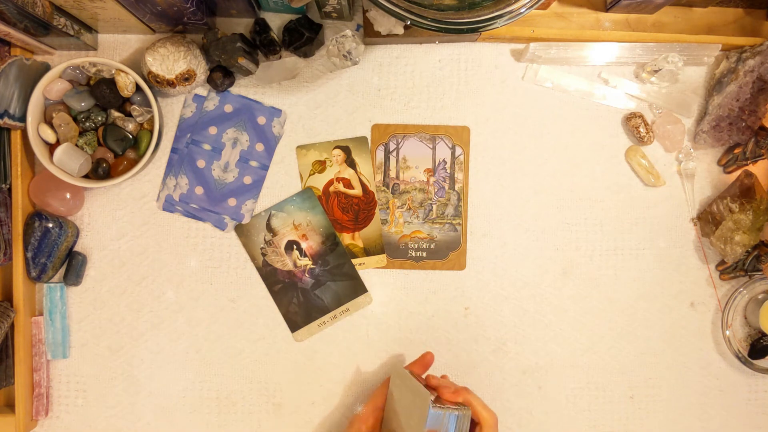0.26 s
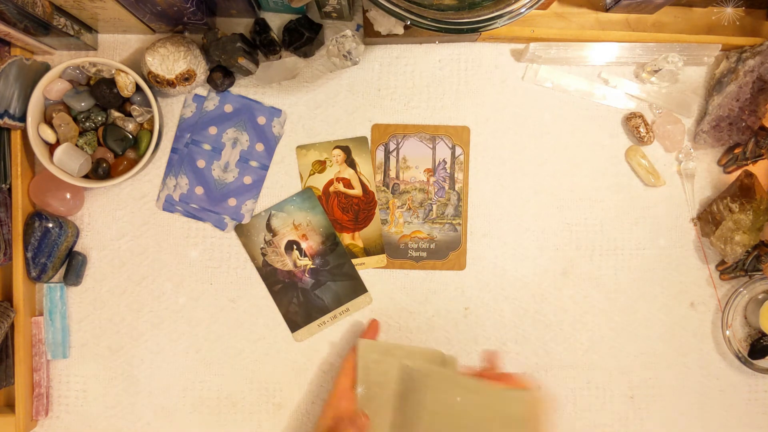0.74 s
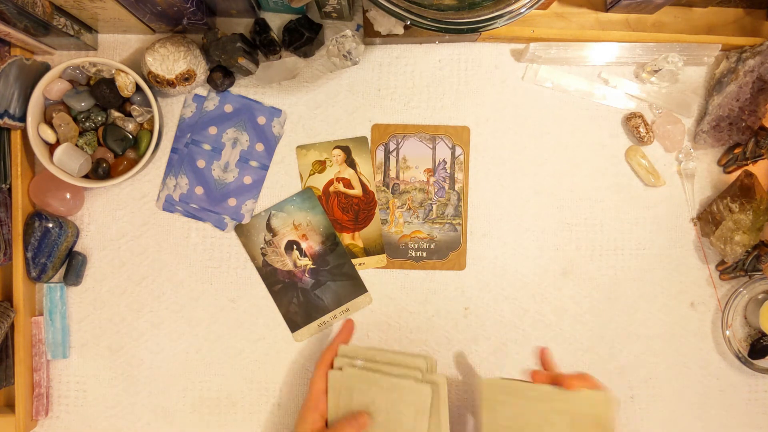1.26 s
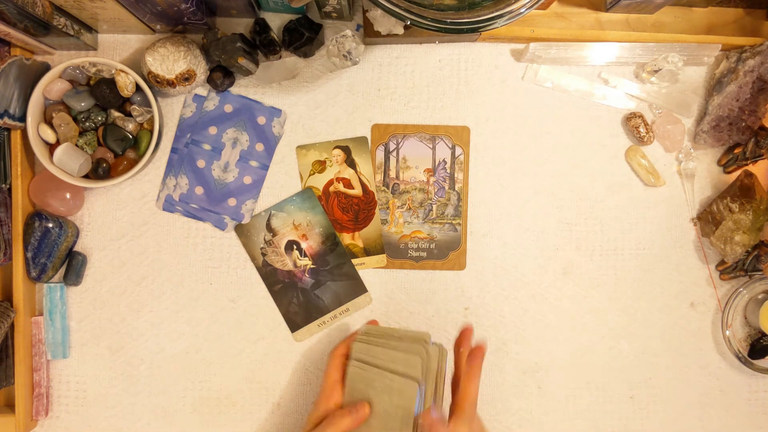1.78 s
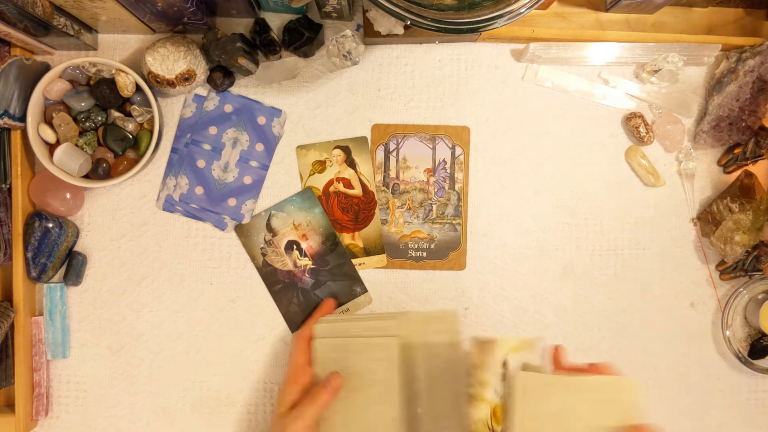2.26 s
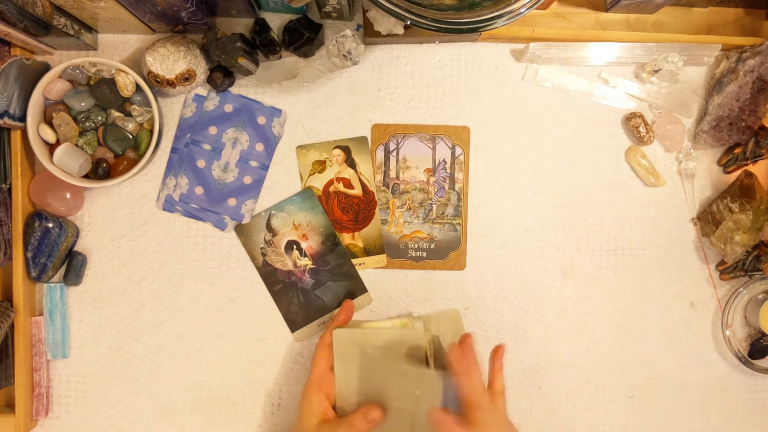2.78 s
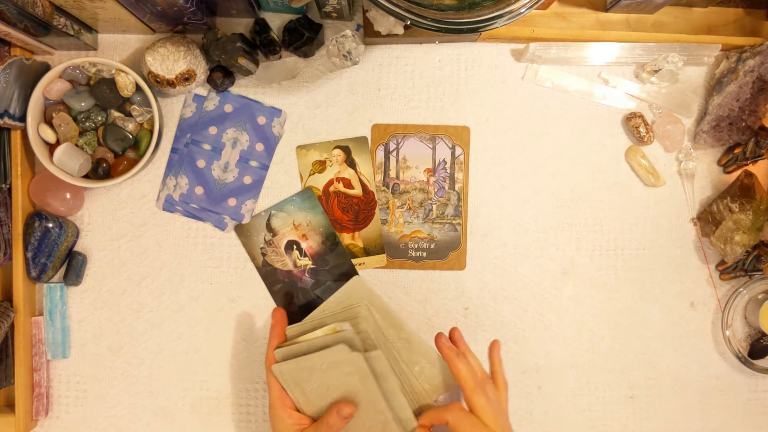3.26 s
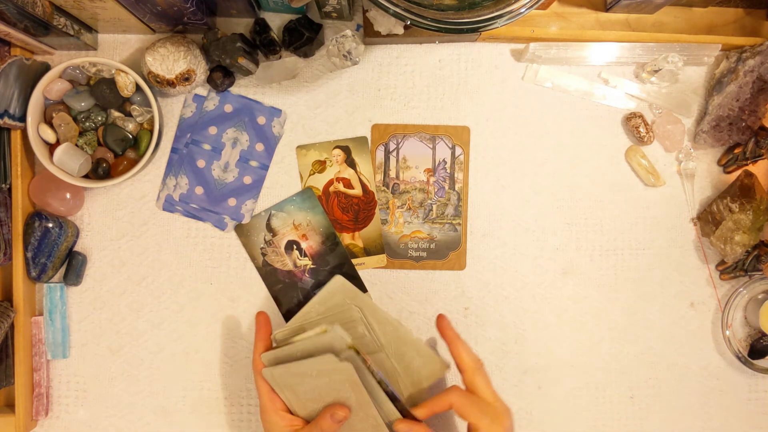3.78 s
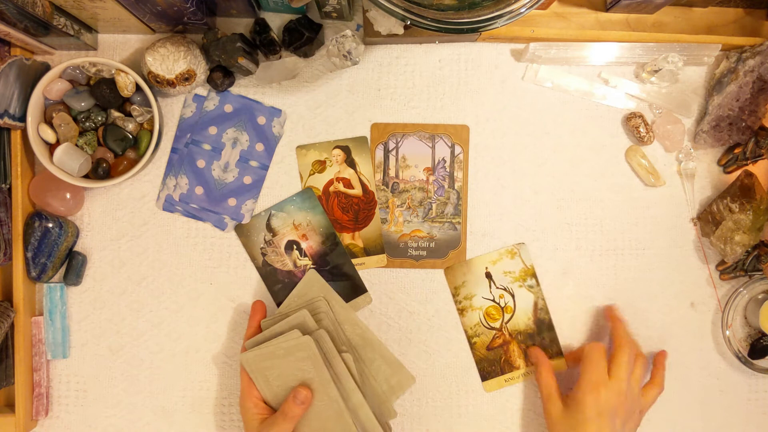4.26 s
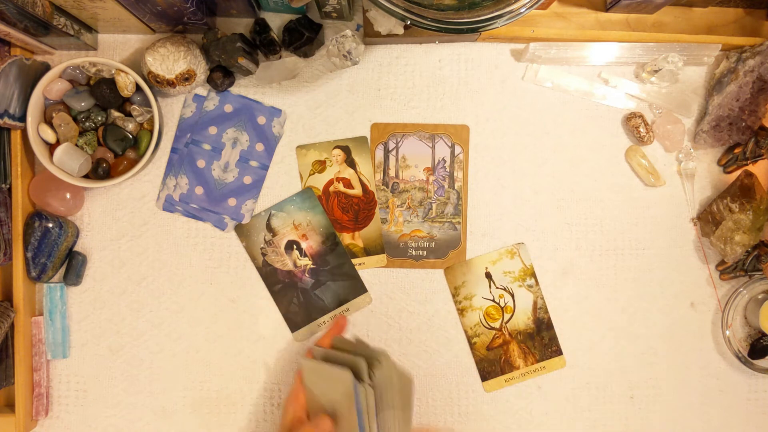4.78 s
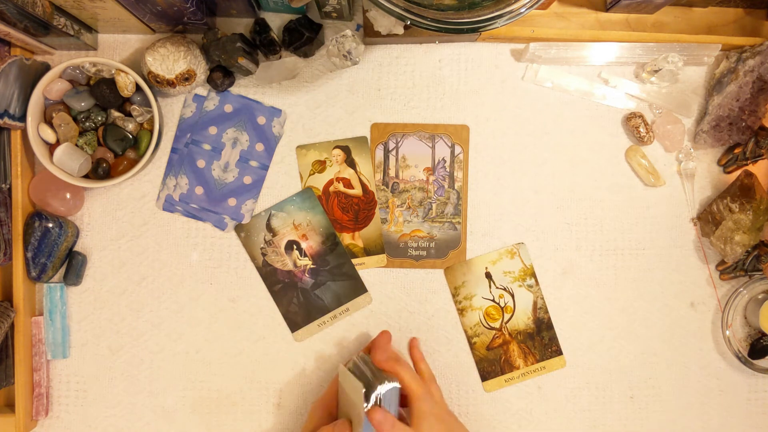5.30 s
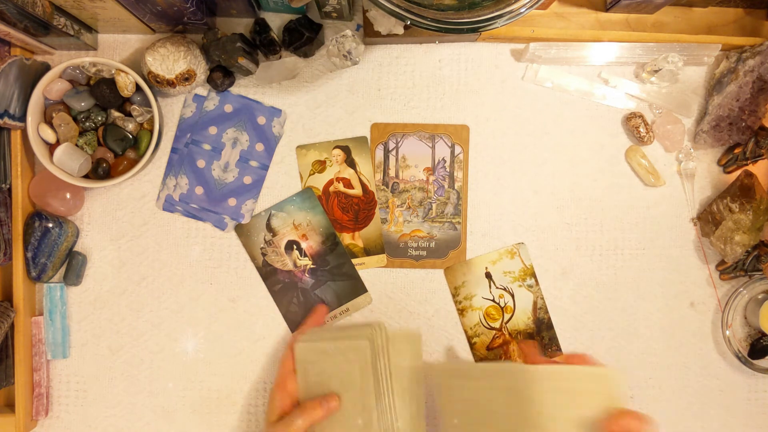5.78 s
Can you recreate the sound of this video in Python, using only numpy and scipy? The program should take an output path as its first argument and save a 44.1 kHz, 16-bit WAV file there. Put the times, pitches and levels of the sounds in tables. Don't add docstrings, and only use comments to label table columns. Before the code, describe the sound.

A small, dry, quiet room with a steady faint low ventilation hum; the cards are close to a phone microphone. At first there are only faint rubs and a tiny tick, with a brief soft press at 0.8 s. From 1.0 to 1.65 s stiff coated cards slide in gritty, bright hissing bursts with sharp edge snaps and small woody knocks. Near-quiet light rubbing follows, with a small tick at 2.1 s and a short hiss at 2.45 s. The hardest knocks and cracking snaps hit at 2.63 and 3.03 s, with a dry clatter and very short echo. Then it is sparse: faint finger rubs, a soft card slide around 4.2 s, dull packet knocks at 4.4 and 4.5 s, a light drag near 4.9 s and soft brushing after 5 s. Just after 6.0 s a card is pressed down with a short crisp scrape.

```python
import sys
import numpy as np
from scipy import signal
from scipy.fft import rfft, irfft, next_fast_len
from scipy.io import wavfile
from scipy.ndimage import uniform_filter1d

SR = 44100
rng = np.random.default_rng(int(sys.argv[2]) if len(sys.argv) > 2 else 0)


def generate_wav(sig):
    pcm = np.round(np.clip(np.atleast_2d(sig).T, -1, 1) * 32767).astype(np.int16)
    wavfile.write(sys.argv[1], SR, pcm)


def linear_from_db(decibels):
    return 10 ** (np.asarray(decibels, float) / 20)


N = 266302

# (frequency [Hz], level [dB])
HUM_COLOUR = [(20, -17.5), (42, -19.5), (62, -5), (95, -7), (200, -7), (300, -3), (440, -9.5), (800, -11),
              (1650, -17), (1950, -22.5), (3500, -31.5), (8100, -36.5), (14800, -36), (16000, -37.5)]
# (frequency [Hz], width [Hz], boost [dB])
AIR_NOTES = [(77, 24, 6.5), (118, 63, 2), (164.6, 16, 12.5)]
# (frequency [Hz], time [s])
ECHO_TIME = [(200, .15), (700, .13), (2500, .15), (8000, .16), (15000, .13)]
# (start [s], end [s])
HUSH = (1.545, 1.5645)
BAND_EDGES = (2700, 5800, 10300)
# (frequency [Hz], level [dB])
SLIDE_COLOUR = [(350, -45), (650, -24), (1200, -16), (1540, -13), (1790, -5), (1930, -12.5), (2270, -5),
                (2620, -11), (4260, -6), (4910, -3.5), (5780, -4.5), (7200, 3), (8100, 7), (9000, 0.5),
                (10300, -8), (13300, -6), (15400, -12.5), (16300, -23)]
# (frequency [Hz], level [dB])
SNAP_COLOUR = [(880, -22), (1500, -2.5), (1980, -11), (2340, -5), (2830, -7), (5600, -5), (8400, -1.5),
               (12400, -11.5), (15500, -18.5), (17000, -25)]

# (time [s], peak [dB], pitch [Hz], 60 dB fade [s])
EDGE_KNOCKS = [(.0453, -47, 587, .022), (.0466, -40, 6440, 0.003), (1.034, -39.5, 590, 0.01),
               (1.039, -38.5, 720, 0.0028), (1.0394, -20.5, 1250, 0.0018), (1.069, -50, 1840, 0.026),
               (1.0753, -41, 2540, 0.0091), (1.128, -44, 1630, 0.0032), (1.3867, -39.5, 1540, 0.016),
               (1.4309, -41.5, 1476, 0.024), (1.4497, -45, 1548, 0.16), (1.636, -42, 1700, 0.022),
               (2.1191, -40, 540, 0.0086), (2.6335, -23.5, 583, 0.04), (2.6345, -20, 950, 0.0071),
               (2.7472, -37, 500, 0.014), (3.0247, -14, 621.6, 0.012), (3.0255, -19, 1140, 0.0094),
               (3.0298, -12, 1020, 0.0027), (3.0813, -12.5, 570, 0.0081), (4.2455, -37, 814, 0.024),
               (4.5296, -26, 621, 0.0084), (4.5305, -28.5, 2030, 0.011), (4.5305, -35, 1530, 0.0096),
               (2.1195, -44.5, 2290, 0.0041), (2.1195, -46, 4660, 0.0094), (3.0815, -37, 1150, 0.0045)]
# (time [s], peak [dB], pitch [Hz], 60 dB fade [s])
SLANTED_KNOCKS = [(1.375, -33, 984, 0.016), (1.376, -25.5, 2283, 0.0071), (1.397, -39, 836, 0.018),
                  (1.4085, -38.5, 870, 0.0047), (1.578, -30.5, 680, 0.0071), (1.597, -36.5, 730, 0.0079),
                  (2.529, -50, 450, 0.1), (2.543, -44, 492, 0.058), (2.54, -48.5, 1780, 0.029),
                  (2.543, -55, 1223, 0.11), (2.61, -47, 1530, 0.025), (2.6338, -17, 1463, 0.016),
                  (2.634, -24.5, 198, 0.017), (2.6418, -28.5, 1403, 0.085), (2.74, -40, 1510, 0.011),
                  (3.036, -35, 1460, 0.044), (3.042, -34, 883, 0.023), (3.048, -36, 1020, 0.014),
                  (3.051, -34, 1545, 0.051), (3.058, -42, 750, 0.051), (3.033, -32, 650, .03),
                  (3.04, -35, 420, 0.072), (3.083, -33, 300, 0.031), (3.093, -33.5, 520, 0.012),
                  (3.101, -39, 595, 0.015), (3.119, -45, 464, 0.013), (4.4105, -24, 835, 0.026),
                  (4.4237, -34.5, 856, .03), (4.4145, -39, 1090, .015), (4.415, -38.5, 560, .015),
                  (4.427, -42.5, 1104, 0.036), (4.426, -42.5, 587, .05), (4.445, -46, 834, 0.023),
                  (4.427, -72, 2440, 0.027), (4.473, -58, 1670, 0.059), (4.459, -62.5, 1700, .015),
                  (4.412, -39, 410, 0.017), (4.456, -44.5, 461, 0.018)]
# (time [s], peak [dB], pitch [Hz], 60 dB fade [s])
FLAT_KNOCKS = [(1.0425, -36.5, 1563, 0.049), (1.057, -42, 1510, 0.048), (1.07, -45, 1084, 0.075),
               (1.098, -47.5, 1550, 0.057), (1.3722, -34.5, 675, 0.0029), (1.4393, -45, 2540, 0.017),
               (1.621, -38, 640, 0.0032), (2.55, -46.5, 420, 0.06), (2.569, -49, 1780, .06),
               (2.64, -35, 329.3, 0.032), (2.6489, -20.5, 1470, 0.018), (2.65, -25.5, 622, 0.035),
               (2.661, -31.5, 1492, 0.063), (2.672, -38, 1497, .015), (2.695, -40.5, 1485, 0.059),
               (2.72, -46, 1505, 0.027), (2.727, -43, 1560, 0.014), (2.651, -35.5, 200, 0.026),
               (2.671, -36, 904, .01), (2.671, -38, 438, 0.0099), (2.69, -49, 552, 0.069),
               (2.612, -44, 320, .02), (2.572, -52, 1194, 0.25), (2.553, -52.5, 1770, 0.055),
               (3.0, -54.5, 449, 0.14), (3.002, -56.5, 1490, 0.13), (2.762, -50.5, 560, .03),
               (3.034, -33.5, 2480, 0.024), (3.0906, -35, 446, 0.0071), (4.1813, -51, 2257, 0.038),
               (4.2469, -44, 788, .08), (4.25, -54.5, 998, .05), (4.255, -50, 600, .05),
               (4.252, -51, 431, 0.19), (4.405, -44.5, 511, 0.012), (4.431, -37.5, 868, 0.026),
               (4.4705, -50, 803, 0.042), (4.54, -45.5, 638, .04), (4.513, -49, 1730, .05),
               (4.517, -53, 2100, .04), (4.226, -52, 897, .08), (4.512, -57.5, 550, .04),
               (6.007, -46, 176.7, 0.026)]

# (time [s], peak [dB], brightness [dB])
EDGE_FLICKS = [(.0064, -51, 0.5), (.057, -56, 2.5), (0.2106, -60, -9), (1.0296, -34.5, -5),
               (1.035, -23, -2), (1.04, -21, 8), (1.077, -25.5, -5), (1.1373, -19.5, 5), (1.3742, -18, 5),
               (1.378, -22.5, -17.5), (1.579, -17, 0), (1.612, -32, -1), (1.625, -29, 0), (1.5967, -32, -4),
               (1.4165, -34, 5), (1.39, -33, -5), (1.125, -33, 9), (2.7294, -32, 3), (2.611, -47.5, -2),
               (2.1197, -38, -7.5), (2.121, -42, 17), (2.461, -43.5, 3), (2.4735, -51, 4),
               (2.5335, -41.5, 3), (2.54, -31.5, 10.5), (2.544, -42.5, -5), (2.5504, -42, 5),
               (2.6027, -36, 5), (2.6338, -10.5, -2), (2.6364, -15, -9), (2.6426, -27.5, 9),
               (2.652, -12.5, -0.5), (2.924, -53.5, 5.5), (3.0282, -22, 5), (3.0302, -17.5, -2.5),
               (3.037, -22.5, 3), (3.047, -21, 1), (3.0495, -25, -4), (4.5308, -36, -15), (4.795, -66, 1.5),
               (5.4139, -55.5, 13.5), (5.7932, -53.5, 10.5)]
# (time [s], peak [dB], brightness
# [dB], 60 dB fade [s])
EDGE_SCRAPES = [(0.0452, -46.5, -5, 0.014), (1.071, -19, -5, 0.022), (1.4109, -23.5, -7, 0.013),
                (1.588, -36, -10, 0.01), (1.623, -27, 2.5, 0.009), (2.5391, -31, 6, 0.0077),
                (2.57, -31, 5, .02), (2.675, -24.5, -10.5, 0.015), (3.59, -48, -0.5, 0.027),
                (4.038, -47, 7, 0.02), (4.2445, -33, 10.5, 0.0084), (4.424, -52.5, 3, 0.016),
                (4.473, -54, -13.5, .02), (5.258, -48, 15.5, 0.037), (6.019, -26, 8, .008),
                (3.0251, -5, 0.5, .0035), (6.027, -31.5, 8, .008), (2.679, -25, 8, .008),
                (2.6338, -23, 11, .004)]

# (peak time [s], hiss [dB], 30 dB rise [s], 30 dB fall [s], packet bending against hiss [dB])
EDGE_SHOVES = [(1.074, -43, 0.067, 0.1139, -2.5), (1.112, -48, .03, 0.12, -2.5),
               (1.126, -37, .02, 0.0841, -4.5), (1.138, -32.5, 0.02, 0.03, -6),
               (1.15, -38.5, 0.023, 0.0628, -4), (1.448, -34, 0.03, 0.0976, -6),
               (1.465, -31, 0.0533, 0.0137, -5), (1.479, -39.5, 0.0177, 0.0336, -6),
               (1.495, -56, -0.05, 0, -4), (1.543, -43, 0.04, 0.0249, -10.5), (1.566, -50, -0.03, .1, -1),
               (1.578, -35, .04, .04, -8), (1.586, -36, .03, .018, -9), (1.534, -46, 0.02, 0.08, -10),
               (1.598, -37.5, -0.0556, 0.087, -8), (1.607, -37, -0.01, 0.06, -5.5),
               (1.614, -38, 0.0165, 0.0221, -1), (1.797, -50, .03, .05, -12), (2.447, -32, .024, .026, -12),
               (2.462, -51.5, 0.2, -0.19, -14), (2.677, -41.5, 0.1248, 0.0867, -1),
               (2.698, -44.5, 0.02, -0.01, -6.5), (2.716, -45, 0, 0.0271, -8),
               (2.733, -42, 0.0532, 0.0431, -3), (2.748, -42.5, 0.13, 0.05, -0.1),
               (4.09, -63.5, .12, 0.19, -4.5), (4.14, -56, 0.11, 0.12, -4.5), (4.19, -45, 0.05, 0.11, 0.5),
               (4.528, -47.5, 0.03, 0.0444, 3.8), (4.916, -51.5, -0.01, 0.13, -8)]
# (peak time [s], hiss [dB], 30 dB rise [s], 30 dB fall [s], packet bending against hiss [dB])
FACE_PRESSES = [(.784, -36, 0.017, 0.03, -8), (.792, -37, 0.03, 0.0079, -8), (.8, -53.5, .02, 0.08, -1.5),
                (3.003, -66.5, 0.013, 0.085, 6), (1.629, -44.5, .03, 0.08, 1.5),
                (2.653, -27, 0.006, 0.017, -3), (3.036, -35, 0.014, .09, 1), (4.244, -44, 0.11, 0.052, 1),
                (5.99, -52.5, .05, 0.038, -3.5), (5.935, -56, .03, .15, -19), (6.01, -39, .012, .08, -6),
                (6.026, -35, .04, .02, -5.5)]
# (peak time [s], hiss [dB], 30 dB rise [s], 30 dB fall [s], packet bending against hiss [dB])
EDGE_DRAGS = [(.65, -61, 0.039, .35, -7), (1.365, -66, 0.05, 0.045, 5), (1.97, -66, 0.19, 0.086, -3.5),
              (2.14, -75, .05, 0.29, -3.5), (2.282, -55.5, 0.052, 0.72, -15),
              (2.408, -60.5, 0.37, 0.035, -21), (1.026, -82.5, 0.029, 0.018, 11),
              (3.012, -73, 0.072, 0.033, 1), (4.888, -54, 0.038, 0.15, -10.5),
              (5.092, -57.5, 0.06, 0.13, -8.5), (5.488, -72.5, 0.023, 0.43, -7),
              (5.562, -71.5, 0.19, 0.095, -16.5), (5.78, -78, 0.21, 0.073, -6),
              (5.87, -63, 0.037, 0.21, -14.5), (5.96, -59, 0.15, 0.25, -21)]
# (peak time [s], hiss [dB], 30 dB rise [s], 30 dB fall [s], packet bending against hiss [dB])
FACE_RUBS = [(.006, -68, .1, 0.057, -12), (.21, -80.5, .025, 0.064, 3), (.32, -72, 0.12, 0.21, -9),
             (.755, -60, 0.31, .05, -18), (1.885, -51.5, 0.14, 0.16, -25),
             (2.124, -57, 0.052, 0.0083, -1.5), (2.47, -56, 0.028, 0.076, -5),
             (3.34, -67, 0.015, 0.095, -8), (3.524, -78, 0.076, 0.055, -2.5),
             (3.592, -60.5, .02, 0.14, -4.5), (3.69, -72, 0.037, .05, -11.5), (3.904, -66, 0.14, 0.1, -7.5),
             (4.04, -72.5, 0.033, 0.1, -0.5), (4.418, -71.5, 0.031, 0.44, -3),
             (4.545, -71.5, .02, 0.11, 12.5), (5.14, -60.5, .03, .05, -13.5),
             (5.21, -63.5, 0.078, 0.16, -22.5), (5.27, -62.5, 0.11, 0.13, -15.5),
             (5.375, -70.5, 0.2, 0.027, -26)]
# (time [s], hiss [dB], 30 dB fall [s], bending against hiss [dB], fizz against hiss [dB])
LANDING_SKIDS = [
    (.047, -74.5, 0.28, -3, -27.5),
    (1.0345, -35.5, 0.11, -1.5, -2.5),
    (1.3726, -43.5, 0.2058, 0, 2.5),
    (2.536, -61.5, 0.03, -7, -14),
    (2.603, -60, 0.4, 1, -12),
    (2.635, -34.5, 0.0427, 7, -6),
    (2.923, -67, 0.1, -11.5, -17.5),
    (3.027, -31.5, -0.0046, 6, 2),
    (4.796, -75, 0.05, 2.5, -4),
]


def evened(x):
    return x / np.sqrt(np.mean(x ** 2) + 1e-20)


def read(points, hz):
    f, value = np.transpose(points)
    return np.interp(np.log(hz + 1), np.log(f + 1), value)


def add(mix, s, sound):
    part = mix[round(s * SR):][:len(sound)]
    part += sound[:len(part)]


def colour(x, points):
    level_db = np.maximum(read(points, abs(np.fft.fftfreq(4096, 1 / SR))), -100)
    log_gain = np.log(linear_from_db(level_db))
    taps = np.fft.ifft(np.exp(np.conj(signal.hilbert(log_gain)))).real[:1024]
    return signal.oaconvolve(x, taps / np.linalg.norm(taps))[:len(x)]


def band(x, lo_hz, hi_hz):
    sos = signal.butter(2, [lo_hz, min(hi_hz, .45 * SR)], "band", fs=SR, output="sos")
    return signal.sosfilt(sos, x)


def split(x):
    size = next_fast_len(len(x))
    hz, z = np.fft.rfftfreq(size, 1 / SR), rfft(x, size)
    below = [0, *(1 / (1 + (hz / edge) ** 12) for edge in BAND_EDGES), 1]
    return [irfft(z * (upper - lower), size)[:len(x)] for lower, upper in zip(below, below[1:])]


def patches(shape, bins, frames):
    tall = uniform_filter1d(rng.standard_normal(shape), size=bins, axis=0)
    return evened(uniform_filter1d(tall, size=frames, axis=1))


def hum():
    hz = np.fft.rfftfreq(4096, 1 / SR)
    shape = (len(hz), N // 1024 + 5)
    real, imaginary = rng.standard_normal((2, *shape))
    notes_db = sum(db / (1 + (2 * (hz - f) / width) ** 2) for f, width, db in AIR_NOTES)
    level_db = (read(HUM_COLOUR, hz) + notes_db)[:, None] + 0.38 * patches(shape, 24, 4)
    z = (real + 1j * imaginary) * linear_from_db(level_db)
    return linear_from_db(-64.5) * evened(signal.istft(z, nperseg=4096, noverlap=3072)[1][:N])


def room(x):
    taps = np.zeros(SR // 2)
    at = np.arange(120, len(taps) - 20, 20)
    taps[at + rng.integers(0, 20, len(at))] = rng.choice([-1., 1.], len(at))
    hz, t, z = signal.stft(taps, SR, nperseg=256)
    fade_s = np.maximum(read(ECHO_TIME, hz), .03)[:, None]
    tail = signal.istft(z * linear_from_db(-60 * t / fade_s), SR, nperseg=256)[1]
    return signal.fftconvolve(x, tail / np.linalg.norm(tail))[:N]


def knocks():
    kinds = ((EDGE_KNOCKS, .0015), (SLANTED_KNOCKS, .0025), (FLAT_KNOCKS, .0048))
    blows = [(*row, rise) for table, rise in kinds for row in table]
    mix, slack = np.zeros((2, N))
    t = np.arange(4000) / SR
    wander = uniform_filter1d(rng.standard_normal((len(blows), len(t))), size=30, axis=1)
    wander = np.cumsum(wander, axis=1)
    for (s, db, hz, t60, rise), drift in zip(blows, wander):
        push = np.sin(np.pi / 2 * np.minimum(t / (1.39 * rise), 1)) ** 2
        since_push = np.maximum(t - 1.34 * rise, 0)
        fade = linear_from_db(db - 60 * (since_push / max(0.91 * t60, .003)) ** 1.01)
        loose = np.clip(2.5 * (t60 - .014), 0, .07) * np.sqrt(hz / 1000)
        swing = push * fade * np.sin(2 * np.pi * hz * t + loose * drift)
        add(mix, s - .3 * rise, swing)
        add(slack, s - .3 * rise, swing * np.clip(t / .012, .15, 1))
    rattle = slack * evened(band(band(rng.standard_normal(N), 40, 320), 40, 320))
    shaken = np.sqrt(abs(signal.lfilter([.002], [1, -.998], slack ** 2)))
    crunch = shaken * evened(band(rng.standard_normal(N), 350, 1800))
    crunch = band(band(crunch, 300, 1900), 300, 1900)
    return band(mix + linear_from_db(-8.5) * rattle + linear_from_db(-9.5) * crunch, 170, 9000)


def snaps():
    flick_t60_s = 0.0079
    catches = [(*row, flick_t60_s) for row in EDGE_FLICKS] + EDGE_SCRAPES
    deep, dull, bright = np.zeros((3, N))
    t = np.arange(2500) / SR
    spray = rng.standard_normal((len(catches), 2, len(t)))
    for (s, db, bright_db, t60), (noise, ticks) in zip(catches, spray):
        t60 = max(t60, .002)
        grain = noise * linear_from_db(0.82 * evened(uniform_filter1d(ticks, size=40)))
        crack = linear_from_db(db - 2.5 - 60 * t / t60) * grain * (1 - np.exp(-t / (0.27 * t60)))
        spike_db = db + 5.5 - 1800 * max(t60 - .005, 0)
        crack += linear_from_db(spike_db) * np.exp(-((t - .0004) / .00003) ** 2)
        crack += .45 * np.roll(crack, int(16 + 8 * abs(ticks[0])))
        add(deep, s, crack * linear_from_db(-.8 * bright_db - 1.7 * max(bright_db, 0)))
        add(dull, s, crack * linear_from_db(-.6 * bright_db))
        add(bright, s, crack * linear_from_db(0.21 * bright_db))
    deep, dull, bright = (split(colour(x, SNAP_COLOUR)) for x in (deep, dull, bright))
    return deep[0] + dull[1] + bright[2] + linear_from_db(5.5) * bright[3]


def strokes():
    kinds = ((EDGE_SHOVES, -3), (FACE_PRESSES, -8), (EDGE_DRAGS, -1.5), (FACE_RUBS, -10))
    rows = [(*row, fizz_db) for table, fizz_db in kinds for row in table]
    skid_rise_s = .002
    rows += [(s, db, skid_rise_s, *rest) for s, db, *rest in LANDING_SKIDS]
    t = np.arange(0, N + 32, 32) / SR
    power = np.full((3, len(t)), 1e-10)
    for s, db, rise, fall, bend_db, fizz_db in rows:
        early = np.maximum(s - t, 0) / max(rise, .001)
        late = np.maximum(t - s, 0) / max(fall, .001)
        swell_db = db - 30 * (early ** 0.9 + late ** 0.92)
        power += linear_from_db(2 * (swell_db + np.array([[0], [bend_db], [fizz_db]])))
    hiss_db, bend_db, fizz_db = (np.interp(np.arange(N) / SR, t, 10 * np.log10(p)) for p in power)
    return hiss_db, bend_db - hiss_db, fizz_db - hiss_db


def slides():
    hiss_db, bend_db, fizz_db = strokes()
    slips = linear_from_db(1.7 * np.minimum(rng.exponential(1, N), 6)) * rng.standard_normal(N)
    clumps = uniform_filter1d(rng.standard_normal(N), size=70)
    clumps = evened(uniform_filter1d(clumps, size=70))
    gritty = colour(slips * linear_from_db(1.4 * clumps), SLIDE_COLOUR)
    z = signal.stft(gritty, nperseg=512, noverlap=384)[2]
    fine = patches(z.shape, 3, 24)
    broad = patches(z.shape, 14, 16)
    frame_db = np.interp(np.arange(z.shape[1]) * 128, np.arange(N), hiss_db)
    light = np.clip((-30 - frame_db) / 30, .3, 1)
    top = np.clip(np.fft.rfftfreq(512, 1 / SR)[:, None] / 2000 - 6.8, 0, 1)
    z = z * linear_from_db(light * (3.2 * fine + 2.2 * broad) - 9 * top * (light - .3))
    grit = signal.istft(z, nperseg=512, noverlap=384)[1][:N]
    deep, bend, hiss, fizz = map(evened, split(grit))
    deep_db = -4.5 + 2.26 * np.minimum(bend_db, 0) + 0.24 * np.clip(hiss_db + 44.5, -40, 8)
    bend = bend + linear_from_db(deep_db) * deep
    return linear_from_db(hiss_db - 1.5) * (hiss + linear_from_db(bend_db) * bend + linear_from_db(fizz_db) * fizz)


def scene():
    slide, snap, knock = slides(), snaps(), knocks()
    scatter = linear_from_db(-18) + linear_from_db(-16) * evened(band(rng.standard_normal(N), 50, 330))
    echo = room(linear_from_db(-16.5) * slide + linear_from_db(-8.0) * snap + band(knock * scatter, 310, 8000))
    cards = slide + snap + knock + echo
    t = np.arange(N) / SR
    hushed = (t > HUSH[0]) & (t < HUSH[1])
    return (cards * np.where(hushed, linear_from_db(-25), 1) + hum())[None]


def top_cut(x):
    return signal.sosfilt(signal.butter(12, 16880, fs=SR, output="sos"), x)


def record(dry):
    edge = signal.firwin(511, 15950, window=("kaiser", 9), fs=SR)
    trimmed = signal.oaconvolve(dry, edge[None], "same")
    mix = trimmed + linear_from_db(-32) * (dry - trimmed)
    return top_cut(mix)


dry = scene()
out = record(dry)
generate_wav(out)
```